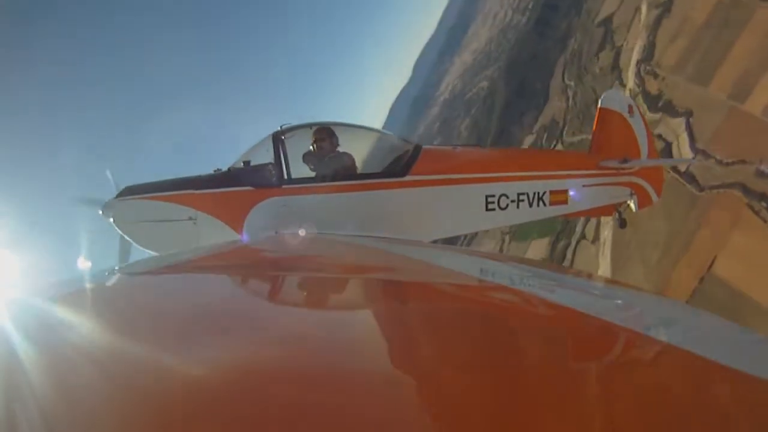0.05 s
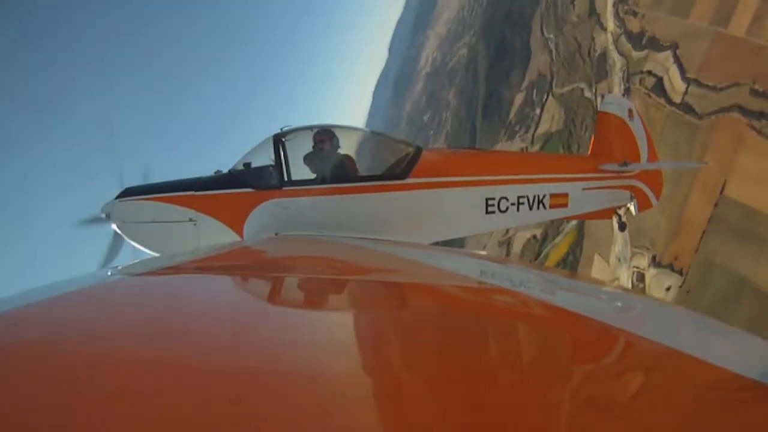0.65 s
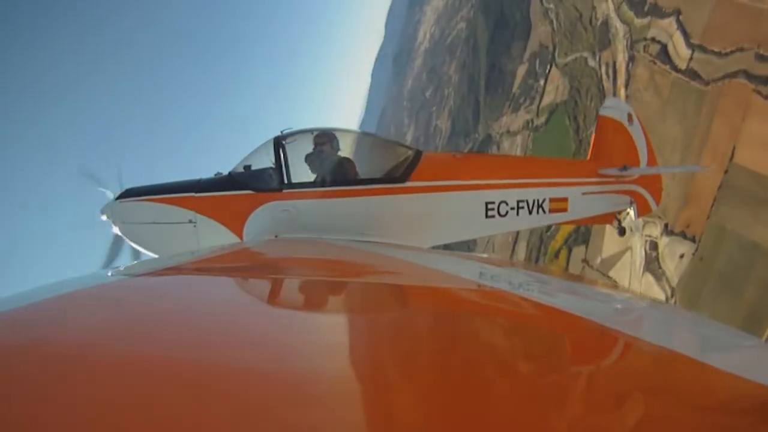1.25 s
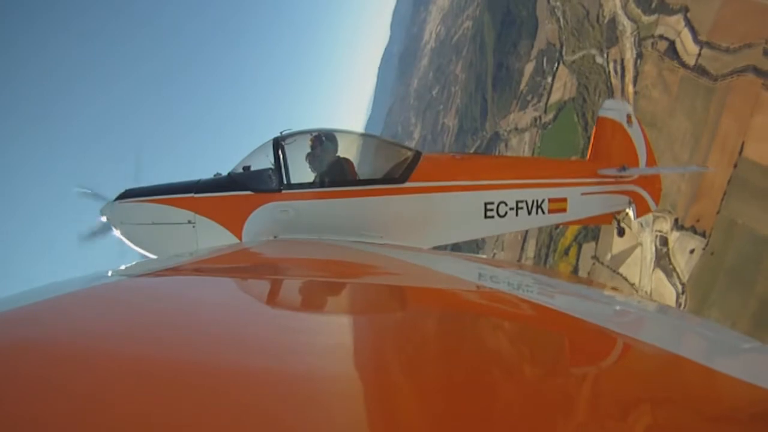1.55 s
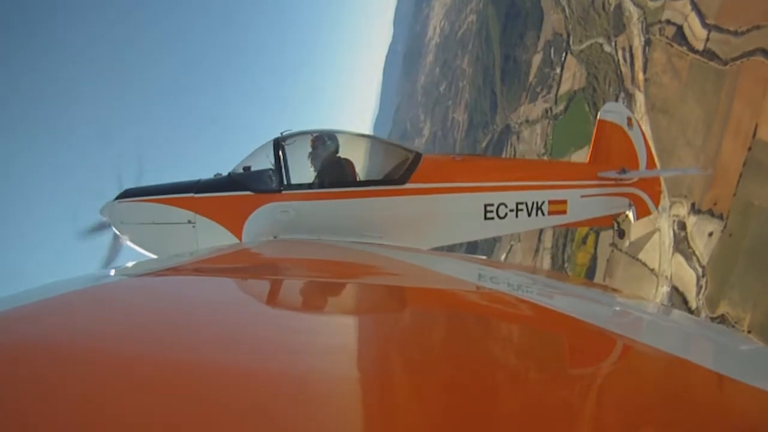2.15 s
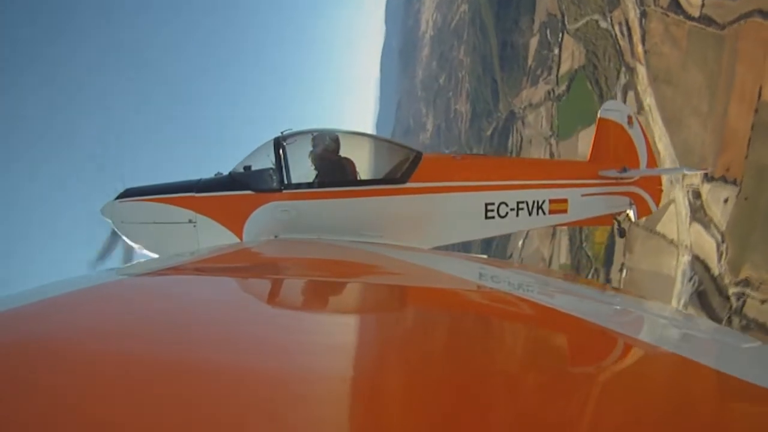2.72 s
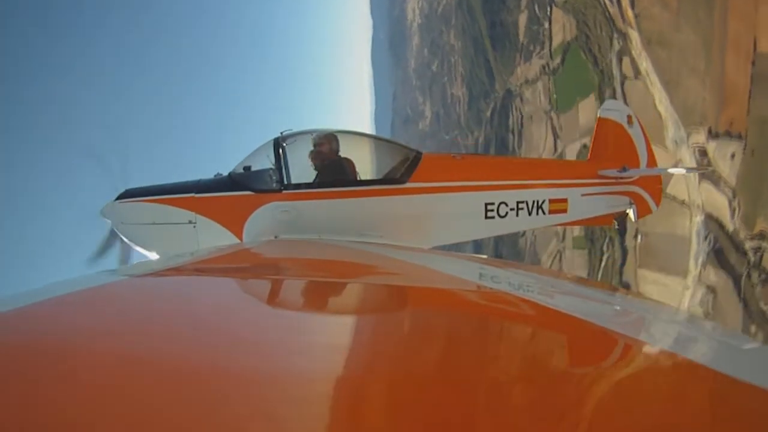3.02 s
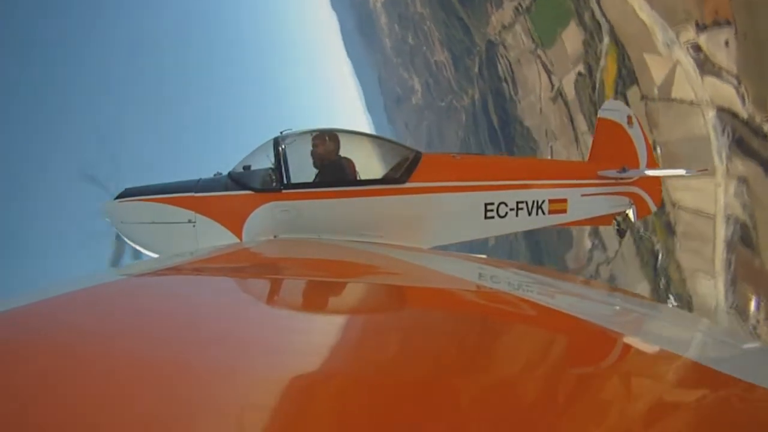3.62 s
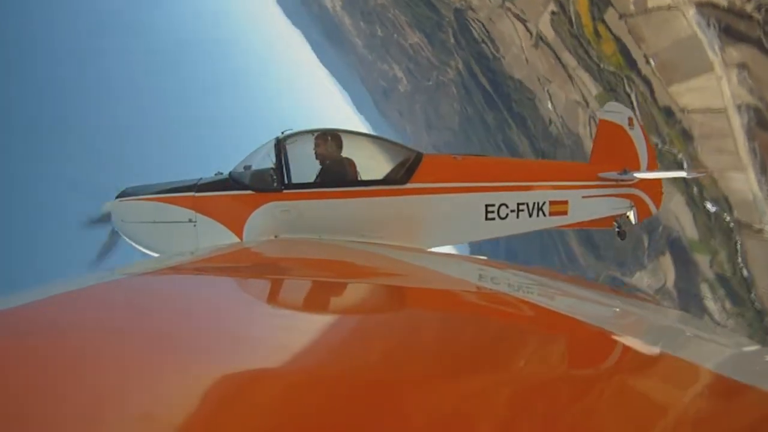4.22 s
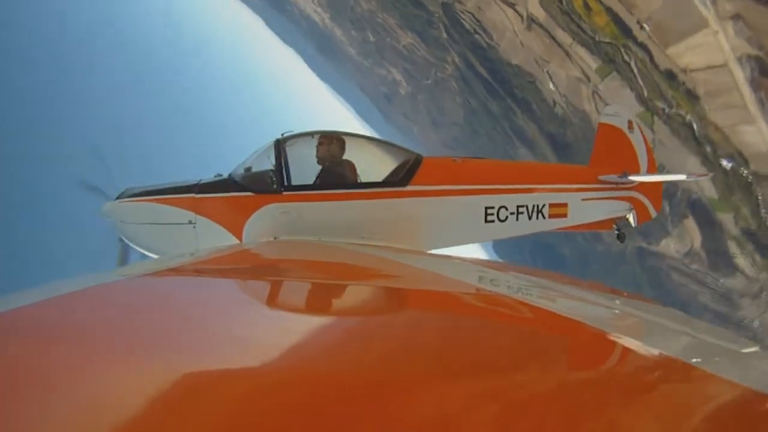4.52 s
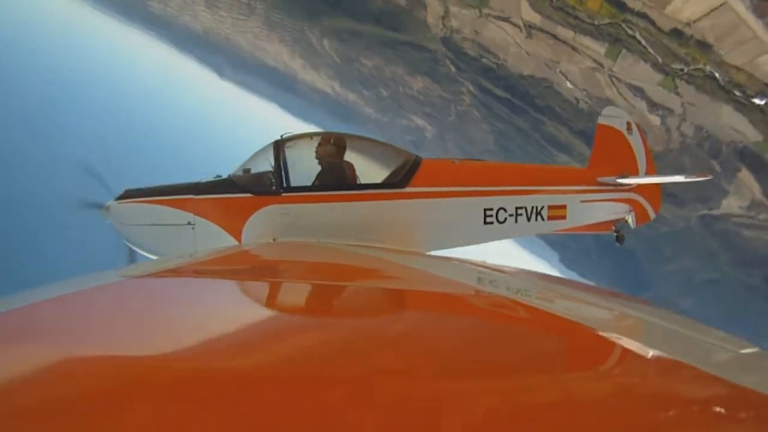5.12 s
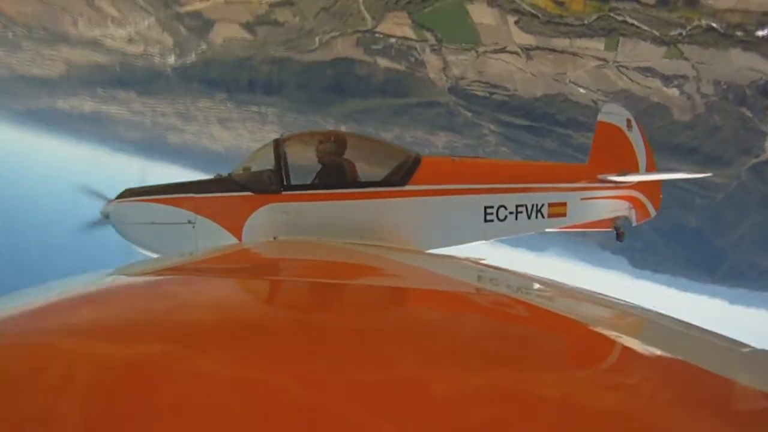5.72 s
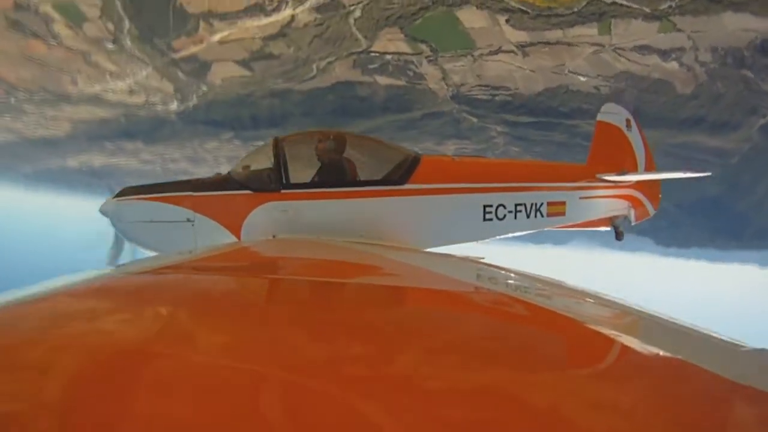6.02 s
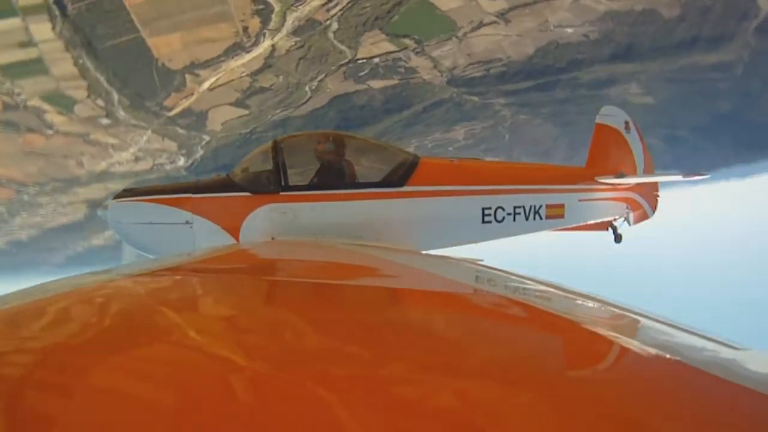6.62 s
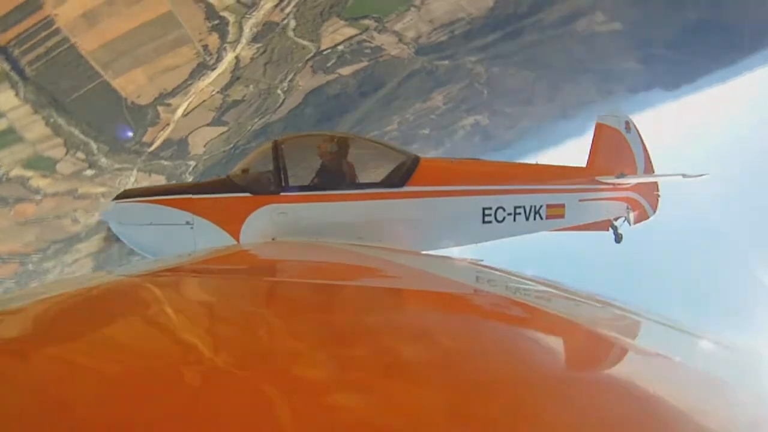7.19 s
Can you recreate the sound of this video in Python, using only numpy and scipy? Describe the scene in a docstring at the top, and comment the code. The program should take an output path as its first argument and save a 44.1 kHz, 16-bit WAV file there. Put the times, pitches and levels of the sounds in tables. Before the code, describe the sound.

Loud wind roars and hisses on a small plane's wing, breaks into low buffeting, then eases to reveal the propeller engine's drone.

```python
"""On the wing through a roll

The microphone is in a camera out on the wing of a small aerobatic plane. Right at the housing the
slipstream roars and hisses, then breaks up into low buffeting; as the wind eases, the beat of propeller
and exhaust carries across the wing. The camera's slow, held samples mirror it all in the treble."""
import sys
import numpy as np
from scipy import signal
from scipy.fft import rfft, irfft, next_fast_len
from scipy.io import wavfile
from scipy.ndimage import map_coordinates

SR = 44100
rng = np.random.default_rng(int(sys.argv[2]) if len(sys.argv) > 2 else 0)


def inscribe(sig):
    """Save sig as 16-bit PCM at rate SR to the path in sys.argv[1].

    A 1-D sig is mono; a 2-D sig holds one channel per row.
    Samples are clipped to [-1, 1] before scaling.
    """
    pcm = np.round(np.clip(np.atleast_2d(sig).T, -1, 1) * 32767)
    wavfile.write(sys.argv[1], SR, pcm.astype(np.int16))


N = 324135


# Steady wind at the microphone: (time [s], buffeting [dB], tearing [dB], hiss [dB])
WIND_LEVELS = [(0, -17.7, -23.5, -18), (.7, -18, -24.5, -19), (1.15, -17, -21.5, -19.3),
               (1.45, -16.5, -22, -24), (2.15, -18.5, -19.5, -23), (2.7, -16.5, -21.5, -27),
               (3.48, -21, -27, -27.5), (3.68, -15.5, -39, -37), (4.05, -18, -44.5, -42),
               (4.42, -17.5, -40, -39), (4.76, -18, -47, -48), (5.1, -18.5, -45, -40.5),
               (5.48, -28, -46, -39.5), (5.9, -28, -42.5, -38.4), (6.2, -21.5, -43, -38),
               (6.6, -22.4, -43.5, -38), (7, -17.5, -38, -37.5), (7.35, -17.5, -36, -38)]
# Air over the housing: (time [s], share of fast air [0-1], share of flow broken away [0-1])
AIRFLOW = [(0, 1, 0.03), (3.4, 0.9, 0.02), (3.8, 0.75, 0.92), (4.4, 0.75, 0.98), (4.75, 0.47, 0.95),
           (5.3, 0.03, 0.27), (6.4, 0.05, 0.15), (7.35, 0.2, 0.42)]
def slipstream(cycle, pump_depth=0.066):
    """Wind right on the microphone: gusts swell the buffeting and tearing, with hiss above them."""
    buffet_db, tear_db, hiss_db = curves(WIND_LEVELS)
    fast, broken = curves(AIRFLOW)
    gust_buffet, gust_tear = gusts()
    beat = np.cos(2 * np.pi * cycle)
    pump = np.exp(pump_depth * (1 - fast) * (beat - pump_depth))  # slow air pulses with the propeller
    roar = np.hypot(amp(buffet_db), gust_buffet) * buffeting(broken)
    tear = np.hypot(amp(tear_db), gust_tear) * tearing()
    return pump * (roar + tear) + amp(hiss_db) * hiss(fast, beat)


# Roar of flow that hugs the housing, and of flow broken away: (frequency [Hz], relative level [dB])
ATTACHED_SPECTRUM = [(15, -24), (30, -6.5), (55, -2.5), (100, -1), (170, -0.5), (300, -1), (480, -1),
                     (620, -4), (760, -13.5), (1000, -22.5), (1400, -34), (2500, -62)]
BROKEN_SPECTRUM = [(15, -28), (30, -19), (55, -0.5), (85, -1), (120, 2.5), (180, 0.5), (300, 0.5),
                   (480, -2), (620, -5.5), (760, -14.5), (1000, -23.5), (1400, -31.5), (2500, -54)]
def buffeting(broken):
    """The low roar on the housing turns lumpier as the flow breaks away."""
    detached = turbulence(BROKEN_SPECTRUM, lump_db=1.3, lump_hz=120)
    attached = turbulence(ATTACHED_SPECTRUM, lump_db=0.66, lump_hz=120)
    return blend(broken, detached, attached)


# Midrange of the wind: (frequency [Hz], relative level [dB])
TEAR_SPECTRUM = [(300, -23), (600, 7.5), (800, 5), (1100, -0.5), (1600, -2), (2100, -1), (3000, -14),
                 (5500, -50)]
def tearing():
    """Quick eddies make a ripping noise close to the microphone."""
    return turbulence(TEAR_SPECTRUM, lump_db=1.5, lump_hz=300)


# Housing resonances in fast and in slow air: (frequency [Hz], relative level [dB])
FAST_HISS_SPECTRUM = [(1000, -38), (1600, -15.5), (2050, -4), (2400, -3), (2800, -0.5), (3350, -4.5),
                      (3750, -1), (4000, -5.5), (4400, -15.5), (5100, -15), (5600, -23.5), (6000, -27)]
SLOW_HISS_SPECTRUM = [(1000, -38), (1700, -12), (2130, 1.5), (2450, -5), (2850, 3), (3200, -3.5),
                      (3700, -12.5), (4400, -16), (5100, -17.5), (5500, -17), (5950, -24)]
def hiss(fast, beat, beat_depth=0.38):
    """The housing resonates: a rush in fast air, a rasp in time with the propeller in slow air."""
    rush = turbulence(FAST_HISS_SPECTRUM, lump_db=0.7, lump_hz=200) * amp(0.8 * wobble(12))
    rasp = turbulence(SLOW_HISS_SPECTRUM, lump_db=1.8, lump_hz=270) * np.exp(beat_depth * beat)
    return blend(fast, rush, unit(rasp))


# Gusts in the broken flow: (middle [s], length [s], buffeting [dB], tearing [dB])
GUST_EVENTS = [(3.845, .09, -20, -37), (4.004, 0.029, -13.5, -33), (4.065, 0.048, -17, -30.5),
               (4.188, 0.046, -18, -46), (4.325, 0.057, -15.5, -39), (4.49, 0.1, -12.5, -33.5),
               (4.656, 0.098, -14.5, -34), (4.766, 0.043, -14.5, -39), (4.857, 0.034, -16, -36),
               (4.984, .04, -15.5, -42)]
def gusts():
    """Strength of the buffeting and of the tearing that gusts bring to the microphone."""
    return sum(np.outer(amp([buffet_db, tear_db]), swell(middle, length, steepness=3))
               for middle, length, buffet_db, tear_db in GUST_EVENTS)


# Lulls at the housing: (middle [s], length [s], gain [dB])
LULL_EVENTS = [(3.96, .035, -2.5), (4.374, 0.045, -5.5), (4.558, 0.049, -3.5), (4.92, .06, -3)]
def lulls():
    """Gain of the slipstream, which drops briefly as each lull passes."""
    return amp(sum(db * swell(middle, length, steepness=1.6) for middle, length, db in LULL_EVENTS))


# Eddies striking right beside the microphone: (time [s], level [dB])
EDDY_HITS = [(3.845, -10), (3.874, -21), (3.888, -6.5), (3.942, -9.5), (3.994, -10.5), (4.011, -12.5),
             (4.062, -15), (4.316, -20), (4.37, -14.5), (4.486, -14), (4.642, -19), (4.759, -14),
             (4.863, -21), (4.972, -17)]
def eddy_slaps(rise_s=0.0011, decay_s=0.0029, swing_hz=470, thump_db=3.0, spit_db=-7):
    """A breaking eddy hits the housing with one hard swing of pressure and a spit of noise."""
    t = np.arange(N) / SR
    blows, thumps = np.zeros((2, N))
    for (hit, db), pitch in zip(EDDY_HITS, rng.standard_normal(len(EDDY_HITS))):
        near = np.abs(t - hit) < .03
        age = t[near] - hit
        push = amp(db) * np.exp(-np.maximum(-age / rise_s, age / decay_s))
        blows[near] += push
        thumps[near] += push * np.cos(2 * np.pi * swing_hz * np.exp(.2 * pitch) * age)
    spit_spectrum = [(200, -6), (600, 4.5), (1000, -0.5), (1600, -5.0), (2300, -17), (5000, -33)]
    spit = coloured(rng.standard_normal(N), spit_spectrum)
    return amp(thump_db) * thumps + amp(spit_db) * blows * spit


# Vortex trains on the housing: (middle [s], length [s], pitch [Hz], level [dB])
VORTEX_TRAINS = [(0.327, 0.73, 154.5, -21), (1.37, 0.57, 474, -21), (2.35, 0.59, 476, -24),
                 (2.77, 0.13, 160, -20), (2.85, .2, 320.6, -26), (3.35, 0.53, 165, -28),
                 (3.63, .16, 218, -17), (3.794, 0.14, 285.7, -17.5), (4.334, .1, 341, -19),
                 (4.673, .06, 236.6, -16.5), (4.763, 0.052, 231, -15), (5.27, 0.13, 242.5, -22),
                 (7.05, .17, 225, -23), (7.17, 0.15, 298.5, -20)]
def vortex_booms():
    """Blunt shapes shed trains of vortices; each swells and fades on a rough note of its own."""
    return sum(amp(db) * swell(middle, length, steepness=1.9) * noisy_tone(np.full(N, hz), width_hz=150)
               for middle, length, hz, db in VORTEX_TRAINS)


# Engine speed: (time [s], blade passes and firings [1/s])
BEAT_RATE = [(0, 81.8), (.7, 79.9), (1.4, 79), (2.2, 77.7), (3.1, 76.6), (4.4, 75.2), (5.3, 74.6),
             (6.3, 74.55), (7.35, 74.7)]
# The engine as heard from the wing: (time [s], propeller [dB], exhaust [dB])
ENGINE_LEVELS = [(0, -21.5, -48), (2.75, -22, -25), (3.1, -18.5, -27), (3.5, -17.5, -22), (3.7, -30, -31),
                 (4.4, -23.5, -29.5), (4.85, -31, -33), (5.1, -19, -23.5), (5.5, -17, -20),
                 (6.4, -18, -19.5), (7.35, -20, -21.5)]
def engine(drift_hz=0.057):
    """Propeller and exhaust beat on one shaft; returns their sound and the running count of blades."""
    rate, = curves(BEAT_RATE)
    blade_db, exhaust_db = curves(ENGINE_LEVELS)
    cycle = np.cumsum(rate + drift_hz * wobble(6)) / SR
    return amp(blade_db) * propeller(cycle) + amp(exhaust_db) * exhaust(cycle, rate), cycle


# Propeller harmonics: (multiple of the blade rate, relative level [dB])
BLADE_HARMONICS = [(1, -0.5), (2, -8.5), (3, -13), (4, -17.5)]
def propeller(cycle, flutter_db=0.27):
    """Each passing blade pushes one hump of pressure out along the wing."""
    return unit(sum(amp(db + flutter_db * wobble(14)) * np.cos(2 * np.pi * k * cycle)
                    for k, db in BLADE_HARMONICS))


# Cylinders in firing order: (strength [dB], lateness [s])
FIRING_ORDER = [(-2.2, .00006), (1.1, -.00005), (-.5, .00005), (1.1, -.00006)]
# Colour of the pipe, and of the gas leaving it: (frequency [Hz], relative level [dB])
PIPE_SPECTRUM = [(120, -29), (300, 0), (450, 2), (600, -2), (720, 2), (950, -10), (1200, -24), (1500, -38),
                 (2500, -55)]
BLAST_SPECTRUM = [(250, -22), (420, 1), (540, 3), (700, -11), (850, -13.5), (1050, -19), (1400, -49),
                  (2500, -65)]
def exhaust(cycle, rate, ring_hz=495, rise_s=0.0019, fall_s=0.0018, after_blade_s=.0006,
            jitter_s=.00005, scatter_db=-0.5, detune=0.0086, blast_db=-12):
    """Each firing is a puff of a few swings and a blast of gas just after the blade; no two alike."""
    firing = np.round(cycle).astype(int)
    late, size, pitch = rng.standard_normal((firing.max() + 1, 3))[firing].T
    cylinder_db, cylinder_late = np.take(FIRING_ORDER, firing, axis=0, mode="wrap").T
    age = (cycle - firing) / rate - after_blade_s - cylinder_late - jitter_s * late
    shape = np.exp(-np.abs(age / np.where(age < 0, rise_s, fall_s)) ** 1.48)
    puff = amp(cylinder_db + scatter_db * size) * shape
    swing = np.cos(2 * np.pi * ring_hz * (1 + detune * pitch) * age)
    blast = coloured(puff * rng.standard_normal(N), BLAST_SPECTRUM)
    return coloured(puff * swing, PIPE_SPECTRUM) + amp(blast_db) * blast


# Air singing on a sharp edge: (time [s], pitch [Hz], level [dB])
EDGE_NOTE = [(0, 2856, -28), (.65, 2613, -32), (1.15, 2225, -25.5), (1.45, 2110, -29), (3.3, 2110, -33.5),
             (3.8, 2100, -48)]
def edge_tone():
    """A sharp edge sings a hoarse note that sinks as the plane slows."""
    hz, db = curves(EDGE_NOTE)
    return amp(db) * noisy_tone(hz, width_hz=340)


def whistle(middle_s=1.04, length_s=0.63, level_db=-39.5, middle_hz=5160, sag_hz_per_s=950):
    """Faint under the wind, a thin edge whistle swells and fades while its pitch sinks."""
    hz = middle_hz - sag_hz_per_s * (np.arange(N) / SR - middle_s)
    return amp(level_db) * swell(middle_s, length_s, steepness=2.3) * noisy_tone(hz, width_hz=87)


def turbulence(spectrum, lump_db, lump_hz):
    """Noise that arrives in lumps, as eddies pass."""
    return coloured(rng.standard_normal(N) * amp(lump_db * wobble(lump_hz)), spectrum)


def noisy_tone(hz, width_hz):
    """A narrow band of noise at rms 1 that follows a pitch curve."""
    phase = 2 * np.pi * np.cumsum(hz) / SR
    return unit(wobble(width_hz) * np.cos(phase) + wobble(width_hz) * np.sin(phase))


def coloured(x, spectrum):
    """x shaped by (frequency [Hz], level [dB]) points on a log axis, at rms 1."""
    points_hz, db = np.transpose(spectrum)
    return unit(filtered(x, lambda hz: amp(np.interp(np.log(hz + 1), np.log(points_hz), db))))


def filtered(x, response):
    """x through a gain that depends on frequency."""
    size = next_fast_len(N + SR // 2)
    return irfft(rfft(x, size) * response(np.fft.rfftfreq(size, 1 / SR)), size)[:N]


def blend(share, a, b):
    """Two unrelated noises mixed at constant power; share is that of a."""
    share = np.clip(share, 0, 1)
    return np.sqrt(share) * a + np.sqrt(1 - share) * b


def swell(middle, length, steepness):
    """A rounded rise and fall, 1 at its middle."""
    return np.exp(-np.abs(2 * (np.arange(N) / SR - middle) / length) ** steepness)


def wobble(rate):
    """A smooth random curve, rate knots a second."""
    return map_coordinates(rng.standard_normal(int(N * rate / SR) + 4), [np.arange(N) * rate / SR])


def curves(rows):
    """One value per sample for each column after the time."""
    times, *columns = np.transpose(rows)
    return [np.interp(np.arange(N) / SR, times, column) for column in columns]


def amp(db):
    return 10 ** (np.asarray(db) / 20)


def unit(x):
    return x / np.sqrt(np.mean(x ** 2) + 1e-20)


def scene():
    """One microphone on the wing: wind up close, the engine farther off."""
    drone, cycle = engine()
    wind = lulls() * slipstream(cycle) + eddy_slaps()
    flow_tones = edge_tone() + whistle() + vortex_booms()
    return (wind + drone + flow_tones)[None]


def record(dry, ceiling=1.0, hold_hz=12000, top_hz=15330):
    """The microphone rounds the peaks; the camera samples slowly and holds each value four times."""
    rounded = dry[0] / (1 + np.abs(dry[0] / ceiling) ** 4) ** (1 / 4)
    held = np.repeat(signal.resample_poly(rounded, hold_hz, SR), 4)
    mirrored = signal.resample_poly(held, SR, 4 * hold_hz)[:N]
    return filtered(mirrored, lambda hz: hz < top_hz)[None]


dry = scene()
out = record(dry)
inscribe(out)
```